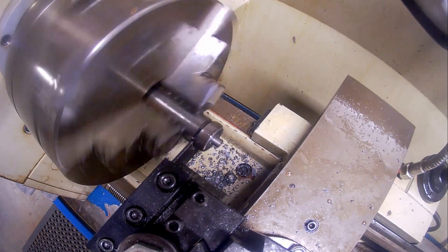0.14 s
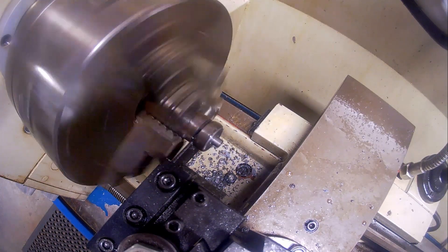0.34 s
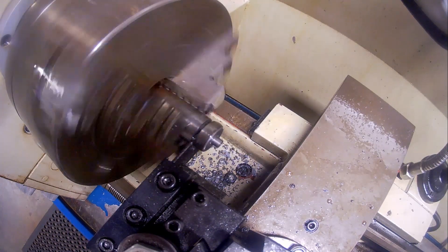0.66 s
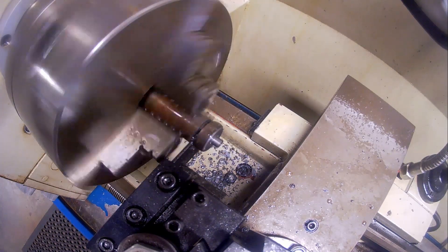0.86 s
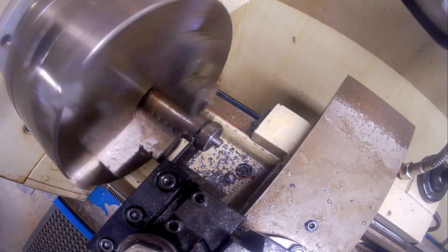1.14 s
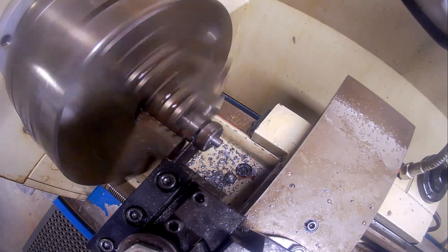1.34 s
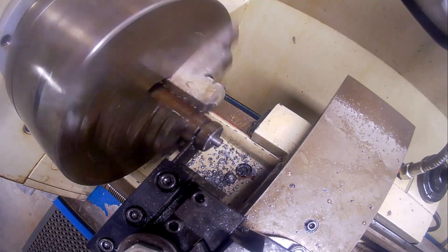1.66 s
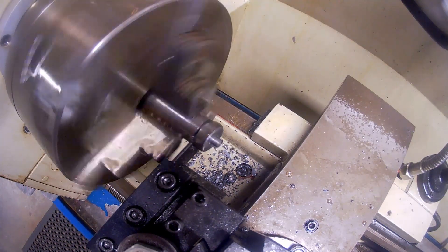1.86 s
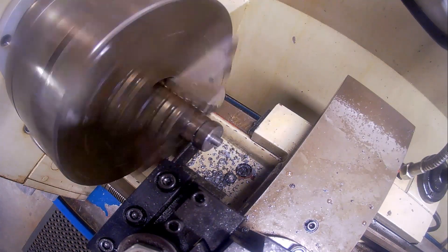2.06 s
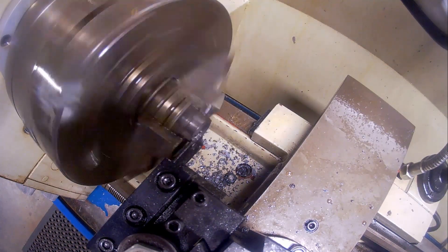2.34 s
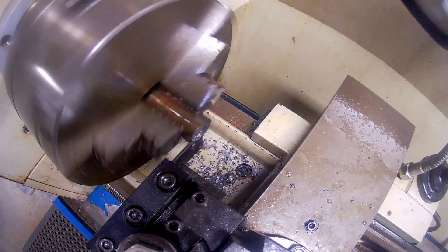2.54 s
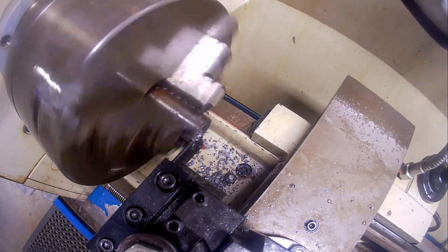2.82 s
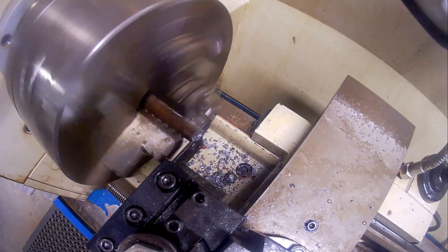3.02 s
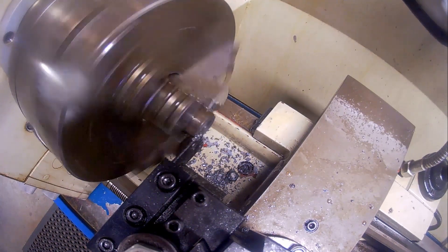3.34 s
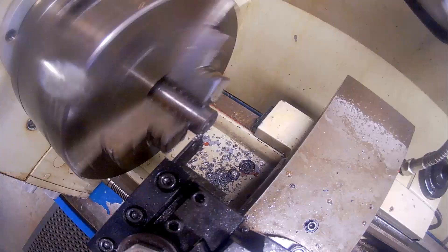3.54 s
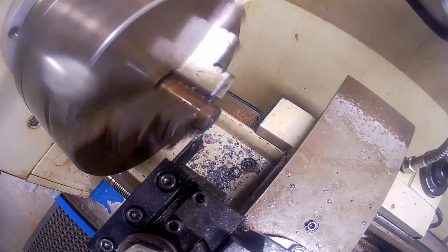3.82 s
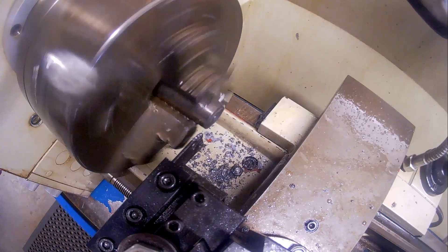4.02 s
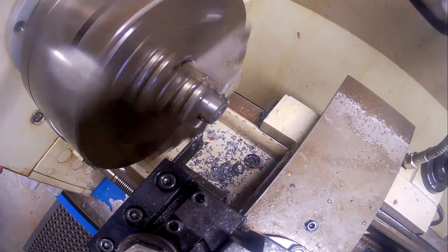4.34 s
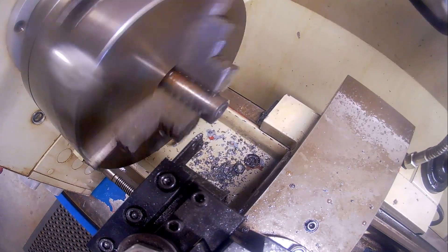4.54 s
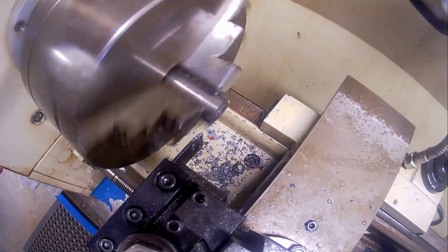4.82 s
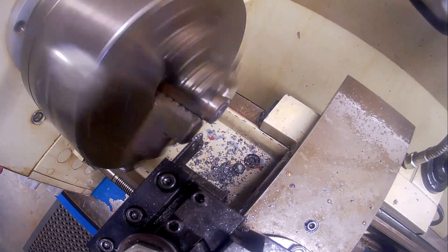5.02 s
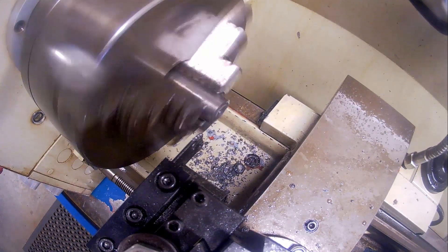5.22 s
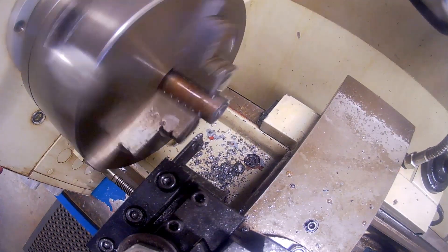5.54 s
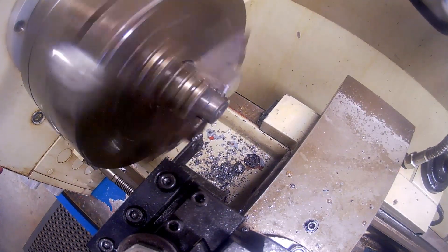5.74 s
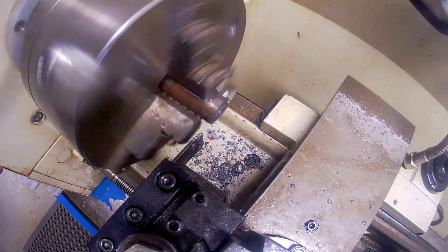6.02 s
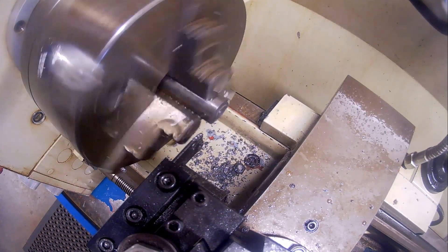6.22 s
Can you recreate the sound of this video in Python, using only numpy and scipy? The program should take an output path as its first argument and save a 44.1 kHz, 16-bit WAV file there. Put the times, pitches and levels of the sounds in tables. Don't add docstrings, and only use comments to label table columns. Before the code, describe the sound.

A metal lathe is already running at full, steady speed in a workshop. A piercing, slightly fluttering electronic whine near 945 hertz stands out, roughened by supply ripple. Under it lie a low hum around 100 to 200 hertz, motor rumble, and a dense grainy rush of bearings and gear teeth with metallic rattle. At about 2.3 seconds two small chips tick in quick succession. From about 2.5 to 4.4 seconds the whine dips a little and turns rougher as the hum shifts and throbs; a faint tick falls at 4.2. At 5.8 a switch clacks and whine and hum stop almost instantly. The spindle coasts on as a softer gear whir, losing treble first, over low room tone. Near 6.35 a lever lands with a clack and dull bed thump. Close single microphone, left channel only, faint hiss, right silent.

```python
import sys
import numpy as np
from scipy import signal
from scipy.fft import rfft, irfft
from scipy.io import wavfile

SR = 44100
rng = np.random.default_rng(int(sys.argv[2]) if len(sys.argv) > 2 else 0)


def invert_db(level):
    return 10 ** (np.asarray(level, dtype=float) / 20)


def file_out(sig):
    cols = np.atleast_2d(sig).T
    lim = np.clip(cols, -1, 1)
    pcm = np.round(lim * 32767).astype(np.int16)
    wavfile.write(sys.argv[1], SR, pcm)


N = 281358
T = np.arange(N) / SR
OFF_S = 5.79


def evened(x):
    return x / np.sqrt(np.mean(x ** 2) + 1e-20)


def noise():
    return rng.standard_normal(N)


def colour(x, points, silent_db=-100):
    f, db = np.transpose(points)
    hz = np.fft.rfftfreq(len(x), 1 / SR) + 1
    gain = invert_db(np.interp(np.log(hz), np.log(f), db, left=db[0], right=silent_db))
    return irfft(rfft(x) * gain, len(x))


def wander(rate_hz):
    b, a = signal.butter(2, rate_hz, fs=SR)
    settled = signal.lfilter(b, a, rng.standard_normal(N + SR))[SR:]
    return evened(settled)


def ring(x, hz, width_hz):
    r = np.exp(-np.pi * width_hz / SR)
    return signal.lfilter([1 - r, 0, r - 1], [1, -2 * r * np.cos(2 * np.pi * hz / SR), r * r], x)


def double_ring(x, hz, width_hz):
    return evened(ring(ring(x, hz, width_hz), hz, 2 * width_hz))


def turns(hz):
    return 2 * np.pi * np.cumsum(hz) / SR


def powered(fall_s):
    return np.exp(-np.maximum(T - OFF_S, 0) / fall_s)


# (time [s], cutting load [0-1], uneven magnetic pull [about 0-1])
DRIVE_EFFORT = [(0, 0.3, 0.03), (.5, 0, 0.03), (1.9, 0.1, 0.1), (2.5, 0.44, 0.8), (2.9, 0.96, 1.1),
                (3.2, 1, 1.1), (4.3, 1, 1.2), (4.42, 0.77, .75), (4.95, 0, 1), (5.25, .3, 1),
                (5.5, 0.3, -.3), (5.78, .05, 0.6)]


def drive_effort():
    s, load, pull = np.transpose(DRIVE_EFFORT)
    return np.interp(T, s, load), np.interp(T, s, pull)


def supply_phase():
    mean_hz, hunt_hz, hunts_per_s = 49.5, 1.2, 2.5
    return turns(mean_hz + hunt_hz * wander(hunts_per_s) + 2.4 * wander(22)) + .5


# (multiple of the supply rate, level re tone [dB], phase lead [rad])
WHINE_SIDEBANDS = [(-4, -19, 1.5), (-2, -19, .3), (-1, -23, 0), (1, -29, 0), (2, -25, 0), (4, -25, 0)]
# (frequency [Hz], density [dB per Hz])
HOUSING_BUZZ = [(600, -14), (730, -2), (860, 10.5), (1060, 4.5), (1250, -17.5)]
WHINE_HZ, WHINE_DB, WHINE_LOAD_DB = 945.2, -25, -3
OCTAVE_DB, BUZZ_DB = -37, -39
RIPPLE_DB, RIPPLE_LOAD_DB, RIPPLE_PULL_DB = -2.5, -0.5, 4.5


def whine(supply, load, pull):
    tone = turns(WHINE_HZ + 2.6 * wander(28) + .7 * wander(3)) + np.pi / 2
    tones = np.cos(tone) + invert_db(OCTAVE_DB) * np.cos(2 * tone)
    ripple_db = RIPPLE_DB + RIPPLE_LOAD_DB * load + RIPPLE_PULL_DB * pull
    for order, db, lead in WHINE_SIDEBANDS:
        strength = invert_db(db + ripple_db + 1.0 * wander(3.0))
        tones += strength * np.cos(tone + order * supply + lead)
    tones *= np.sqrt(2) * invert_db(WHINE_DB + WHINE_LOAD_DB * load)
    buzz = invert_db(BUZZ_DB) * evened(colour(noise(), HOUSING_BUZZ))
    return (tones + buzz) * powered(0.0067)


# (frequency [Hz], density [dB per Hz])
MOTOR_RUMBLE = [(14, -14.5), (40, -17.5), (60, -9.5), (85, -10.5), (140, -5), (220, -9), (260, -14),
                (330, -23), (450, -57.5)]
SECOND_DB, SECOND_PULL_DB = -39.5, 6.5
THIRD_DB = -43.5
FOURTH_DB, FOURTH_LOAD_DB, CHOKE_LOAD, CHOKE_SPAN = -32.5, -14.5, 0.74, 0.4
RUMBLE_DB, RUMBLE_LOAD_DB = -39.5, -5.5


def hum(supply, load, pull):
    choke = np.clip((load - CHOKE_LOAD) / CHOKE_SPAN, 0, 1)
    second_db = SECOND_DB + SECOND_PULL_DB * pull + 2.2 * wander(18)
    fourth_db = FOURTH_DB + FOURTH_LOAD_DB * choke + 1.0 * wander(30)
    rumble_db = RUMBLE_DB + RUMBLE_LOAD_DB * choke + 6.0
    second = invert_db(second_db) * np.cos(2 * supply + turns(4 * wander(12)))
    third = invert_db(THIRD_DB) * np.cos(3 * supply)
    fourth = invert_db(fourth_db) * np.cos(4 * supply)
    rumble = invert_db(rumble_db) * evened(colour(noise(), MOTOR_RUMBLE))
    return (1.204 * (second + third + fourth) + rumble) * powered(0.029)


# (frequency [Hz], density [dB per Hz])
CASTING_RESPONSE = [(120, -10.5), (350, -8.5), (510, -4), (650, -6.5), (1000, -1), (1380, -2), (1700, -8.5),
                    (2400, -15), (2950, -24.5), (3300, -14), (4100, -20), (4600, -30.5), (5750, -47.5),
                    (7000, -45.5), (8300, -57)]
# (frequency [Hz], bandwidth [Hz], level [dB])
PANEL_MODES = [(1376, 150, -1), (2073, 62, -20.5), (2750, 90, -17.5), (3454, 150, -8), (3823, 170, -10),
               (6600, 580, -31.5), (8800, 280, -45.5)]
RATTLE_DB, TAPS_PER_S = -9, 1100
GEARS_DB, BRIGHT_DB, SETTLE_DB, SETTLE_S = -36, -11.5, -0.5, 0.13
COAST_DB_PER_S, DULL_DB_PER_S = -9.5, -21


def gears():
    settle_db = SETTLE_DB * np.exp(-T / SETTLE_S)
    coast_s = np.maximum(T - OFF_S, 0)
    level_db = GEARS_DB + settle_db + COAST_DB_PER_S * coast_s
    bright_db = BRIGHT_DB - settle_db + DULL_DB_PER_S * coast_s

    rolling = evened(colour(noise() * invert_db(0.86 * wander(45)), CASTING_RESPONSE))
    tap_size = invert_db(2.64 * np.minimum(rng.exponential(1, N), 5)) * rng.choice([-1, 1], N)
    tap_now = rng.random(N) < TAPS_PER_S / SR
    taps = tap_size * tap_now * invert_db(0.53 * wander(32))
    rattle = evened(sum(invert_db(db) * double_ring(taps, hz, width) for hz, width, db in PANEL_MODES))

    both = invert_db(0.3 * (bright_db + 10.5)) * rolling + invert_db(RATTLE_DB) * rattle
    low = signal.sosfiltfilt(signal.butter(2, 2300, fs=SR, output="sos"), both)
    return invert_db(level_db + 3.0) * (low + invert_db(bright_db + 11.5) * (both - low))


# (frequency [Hz], density [dB per Hz])
ROOM_TONE = [(20, -2.5), (60, -3.5), (110, -7), (170, -3), (300, -3), (600, -12.5), (900, -12)]
# (frequency [Hz], bandwidth [Hz], level [dB])
SINGING_COVERS = [(1405, 96, -48), (793, 92, -53)]
ROOM_DB = -47.5


def shop():
    out = invert_db(ROOM_DB) * evened(colour(noise(), ROOM_TONE))
    for hz, width, db in SINGING_COVERS:
        out += invert_db(db + 2.0 * wander(7.9)) * double_ring(noise(), hz, width)
    return out


# (time [s], peak level [dB], scrape length [s], ring [Hz],
# sharpness over 2 kHz [dB per octave])
KNOCK_EVENTS = [
    (2.26, -34.5, 0.0071, 3880, 3),
    (2.344, -35, 0.0047, 4300, -5.5),
    (5.78, -35.5, 0.014, 1870, -6.5),
    (6.343, -43, 0.013, 4100, -4),
    (6.348, -39, 0.021, 1940, -5),
    (4.217, -46, 0.003, 4430, -8),
]
# (frequency [Hz], density [dB per Hz])
SCRAPE_SPECTRUM = [(800, 0), (2000, 6.5), (4300, -4.5), (5600, -9), (7000, -9), (8400, -20), (9600, -18),
                   (13000, -36), (14500, -41.5)]
# (time [s], level [dB], rise [s])
BED_THUMPS = [
    (5.78, -33, 0.0015),
    (6.352, -26, .022),
]


def knocks():
    out, t = np.zeros(N + SR), np.arange(8192) / SR
    for s, db, length, hz, sharp_db in KNOCK_EVENTS:
        burst = rng.standard_normal(len(t))
        contact = np.minimum(t / .001, 1) / (1 + (t / length) ** 6)
        room_tail = np.minimum(t / .002, 1) * np.exp(-t / 0.019)
        tilted = [(f, d + sharp_db * max(np.log2(f / 2000), 0)) for f, d in SCRAPE_SPECTRUM]
        scrape = evened(colour(burst, tilted)) * (contact + 0.33 * room_tail)
        ping = evened(ring(ring(burst, hz, 440), hz, 770)) * (0.32 * contact + 0.39 * room_tail)
        out[round(s * SR):][:len(t)] += invert_db(db) * (scrape + ping)
    swing = np.sin(2 * np.pi * 158 * t) * np.exp(-t / .06)
    for s, db, rise in BED_THUMPS:
        out[round(s * SR):][:len(t)] += invert_db(db) * np.minimum(t / rise, 1) * swing
    return out[:N]


def scene():
    load, pull = drive_effort()
    supply = supply_phase()
    left = whine(supply, load, pull) + hum(supply, load, pull) + gears() + shop() + knocks()
    return np.array([left, np.zeros(N)])


def band_limit(x):
    return signal.sosfilt(signal.butter(12, 15500, fs=SR, output="sos"), x)


# (frequency [Hz], density [dB per Hz])
INPUT_HISS = [(300, 0.5), (8000, -1), (11000, -1.5), (14000, -3.5), (14900, -1.5), (15500, -12.5)]
HISS_DB, CEILING, BIAS = -69.5, .75, 0.12


def record(dry):
    hiss = invert_db(HISS_DB) * evened(colour(noise(), INPUT_HISS))
    live = CEILING * np.tanh(2 * dry[0] / CEILING) + 2 * hiss + BIAS
    return band_limit(np.array([live, dry[1]]))


dry = scene()
out = record(dry)
file_out(out)
```